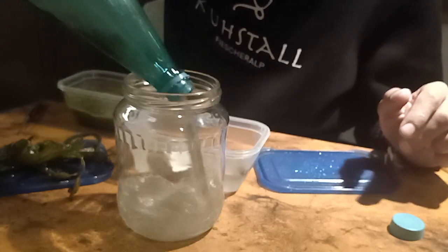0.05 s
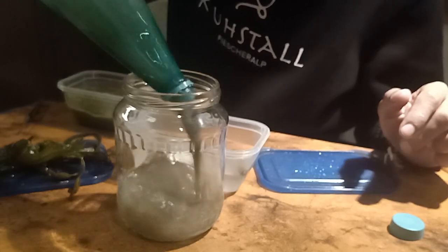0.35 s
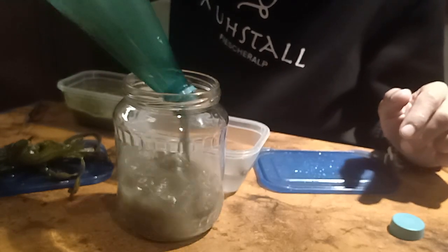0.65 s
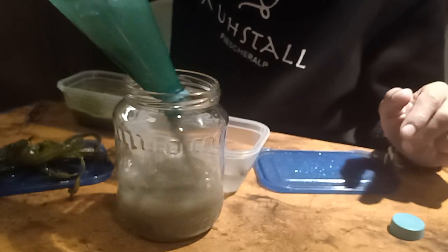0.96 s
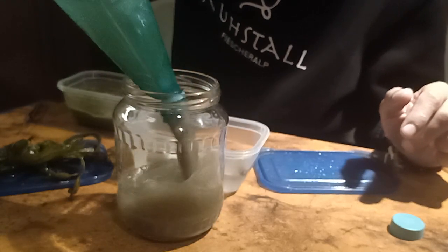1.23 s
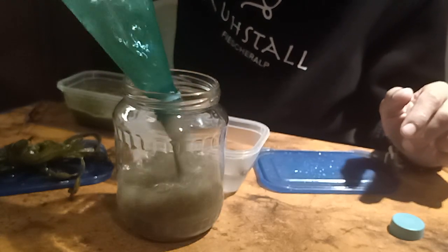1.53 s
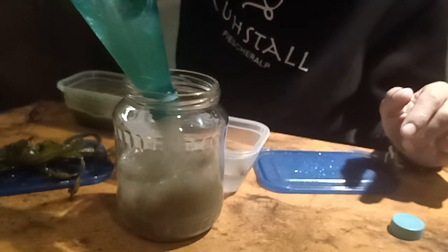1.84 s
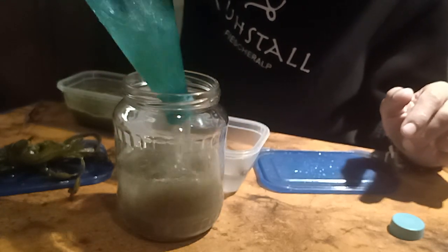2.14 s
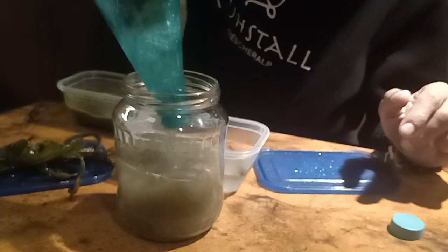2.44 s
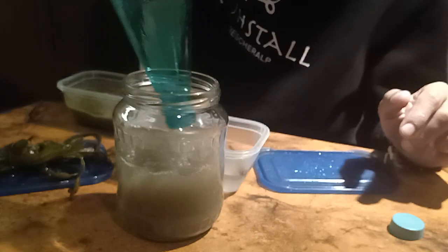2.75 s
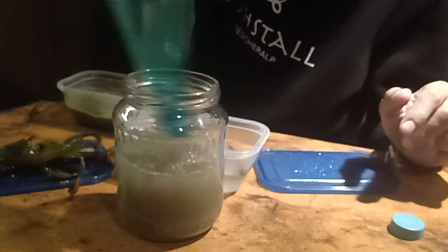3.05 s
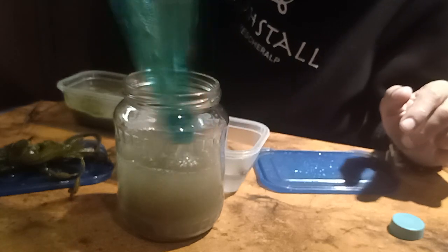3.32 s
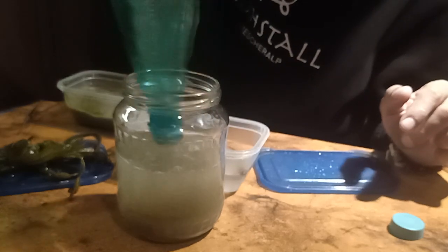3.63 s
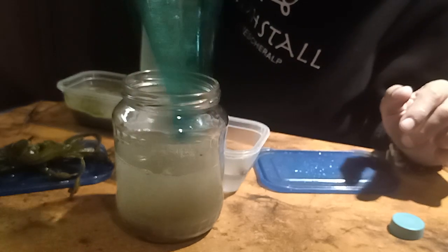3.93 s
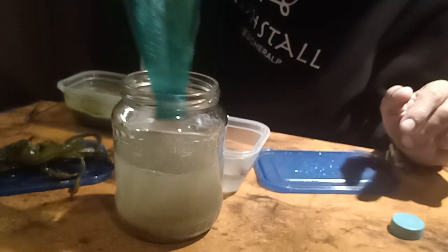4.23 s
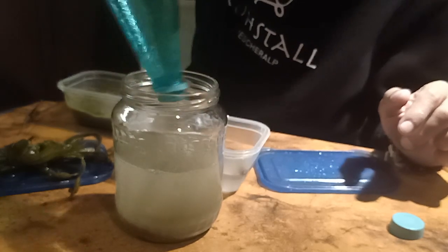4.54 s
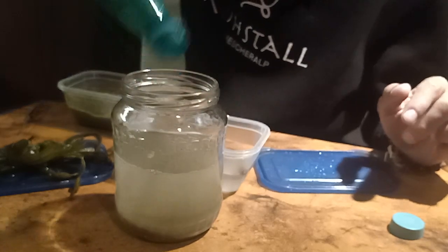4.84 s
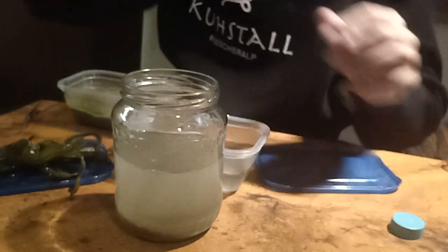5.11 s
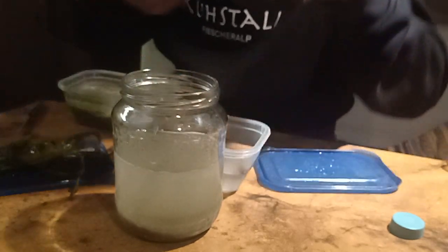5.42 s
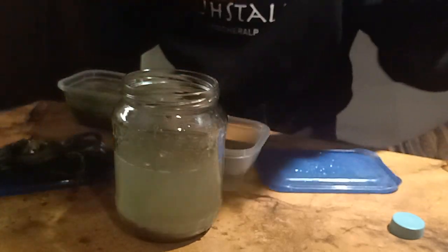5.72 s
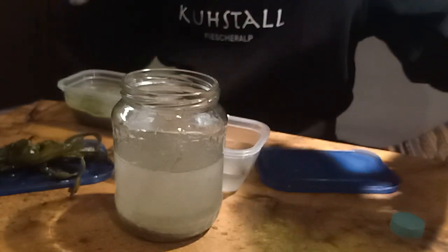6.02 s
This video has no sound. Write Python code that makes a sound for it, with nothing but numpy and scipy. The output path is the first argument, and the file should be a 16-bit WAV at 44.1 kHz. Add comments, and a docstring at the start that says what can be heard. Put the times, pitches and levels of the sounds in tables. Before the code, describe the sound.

Sandy water dribbles and plops into a glass jar, then a plastic funnel is knocked repeatedly against the rim, thumping the table.

```python
"""At a wooden table, close up, sandy water dribbles from a plastic funnel into a glass jar.
Lumps of wet sand plop in, boom the air in the jar, trap bubbles and throw spray against the glass.
Then the funnel is knocked and shaken against the jar, which rings and thumps the table.
Sleeves rustle as the funnel is taken away and put down with a soft clatter."""
import sys
import numpy as np
from scipy import signal
from scipy.fft import rfft, irfft, next_fast_len
from scipy.io import wavfile
from scipy.ndimage import uniform_filter1d

SR = 44100
rng = np.random.default_rng(int(sys.argv[2]) if len(sys.argv) > 2 else 0)


def log_audio(samples):
    """Write samples as a 16-bit WAV file to the path given in sys.argv[1]."""
    # one column per channel
    frames = np.atleast_2d(samples).T
    # limit to full scale, then quantise
    limited = np.clip(frames, -1, 1)
    pcm = np.round(limited * 32767).astype(np.int16)
    wavfile.write(sys.argv[1], SR, pcm)


N = 276493
TIME = np.arange(N) / SR
AGE = np.arange(SR * 3 // 4) / SR  # seconds since a hit
CLICK = signal.unit_impulse(len(AGE), 40)


def gain_of(db):
    """Decibels to amplitude."""
    return 10 ** (np.asarray(db) / 20)


def unit_rms(x):
    """Scales to rms 1."""
    return x / np.sqrt(np.mean(x ** 2) + 1e-20)


def curve_at(points, hz):
    """Reads a curve on a log-frequency axis."""
    freqs, values = np.transpose(points)
    return np.interp(np.log(hz + 1), np.log(freqs + 1), values)


def decay(t, t60):
    """Falls by 60 dB in t60 seconds, 4 ms at the quickest."""
    return 1000. ** (-t / np.maximum(t60, .004))


def pan(db):
    """Stereo gains with the left louder than the right by db."""
    return gain_of(np.array([[db], [-db]]) / 2)


def add(mix, s, sound):
    """Lays a sound into the mix at s seconds."""
    part = mix[:, max(round(s * SR), 0):][:, :sound.shape[-1]]
    part += sound[..., :part.shape[1]]


def wander(shape, first, second):
    """Random modulation: noise smoothed over two widths, in samples."""
    return unit_rms(uniform_filter1d(uniform_filter1d(rng.standard_normal(shape), first), second))


# stereo image of the noisy layers: (frequency [Hz], left-right correlation [0-1])
STEREO_LIKENESS = [(100, 0), (300, 1), (700, 0.31), (2500, 0.1), (12000, 0.2)]
def stereo_image(x):
    """Pulls two unrelated channels to the centre in the low mids and leaves the treble wide."""
    size = next_fast_len(x.shape[1])
    a, b = rfft(x, size)
    same = curve_at(STEREO_LIKENESS, np.fft.rfftfreq(size, 1 / SR))
    mid, side = a * np.sqrt((1 + same) / 2), b * np.sqrt((1 - same) / 2)
    return irfft(np.array([mid + side, mid - side]), size)[:, :x.shape[1]]


def eq(x, spectrum, treble_db=0, size=2048):
    """Minimum-phase EQ of unit energy, then a shelf that applies 11% (lows) to 28% of treble_db."""
    hz = abs(np.fft.fftfreq(size, 1 / SR))
    shelf = gain_of(treble_db * curve_at([(2200, 0.11), (4200, 0.28)], hz))
    gain = unit_rms(gain_of(curve_at(spectrum, hz))) * shelf
    taps = np.fft.ifft(np.exp(np.conj(signal.hilbert(np.log(gain + 1e-6))))).real
    return signal.oaconvolve(x, taps[None], axes=1)[:, :x.shape[1]]


def burst(t60, snap, snap_t60, rise_t60=0.012, grain_db=3):
    """An uneven rattle of tiny contacts: a quick attack, then two decays layered."""
    grain = unit_rms(gain_of(grain_db * wander(len(AGE), 70, 50)))
    noise = stereo_image(rng.standard_normal((2, len(AGE)))) * grain
    return noise * (decay(AGE, t60) + snap * decay(AGE, snap_t60)) * (1 - decay(AGE, rise_t60)) ** 2


def ringing(modes, scatter_db, spread, detune=0, since=0):
    """Each hit lands elsewhere, so modes vary in level and pitch and reach the two sides out of step."""
    out = np.zeros((2, len(AGE)))
    for hz, db, t60 in modes:
        strength, skew, bend = np.clip(rng.standard_normal(3), -1.5, 1.5)
        stereo_phase = spread * skew * np.array([[1], [-1]])
        phase = 2 * np.pi * hz * (1 + detune * bend) * (AGE + since) + stereo_phase
        out += gain_of(db + scatter_db * strength) * decay(AGE, t60) * np.sin(phase)
    return out * (1 - decay(AGE, 0.0063))


def chirp(hz, swell, t60, rise=0.0053, waver=0.017, rough=0.033):
    """A bubble-like tone that swells and rings out, trembling as its pitch creeps up."""
    t = AGE[:SR // 5]
    attack = np.sin(np.pi / 2 * np.minimum(t / max(swell, .0005), 1)) ** 2
    envelope = attack * decay(np.maximum(t - swell, 0), t60)
    wobble, tremble = wander((2, len(t)), 130, 90)
    pitch = hz * (1 + rise * np.tanh(t / 0.037) + waver * wobble)
    return envelope * (1 + rough * tremble) * np.sin(2 * np.pi * np.cumsum(pitch) / SR)


# EQ of the quiet room: (frequency [Hz], level [dB])
ROOM_TONE_EQ = [(20, -5.5), (110, -17), (1260, -29), (2320, -25), (3340, -34.5), (4940, -34), (7700, -47),
                (13500, -46), (16000, -57.5)]
def room_tone(level_db=-57.5):
    """A steady bed of faint rumble and hiss."""
    noise = stereo_image(rng.standard_normal((2, N)))
    return gain_of(level_db) * unit_rms(eq(noise, ROOM_TONE_EQ, size=8192))


# fader ride of the thin stream between the lumps: (time [s], level [dB])
STREAM_FADER = [(0.0, -31), (0.09, -44.5), (1.04, -46), (1.47, -41.5), (2.09, -47), (2.5, -45), (2.77, -41),
                (2.88, -50.5)]
# the jar's colour on the stream: (frequency [Hz], level [dB])
TRICKLE_EQ = [(40, -17), (160, 10.5), (440, -5.5), (630, -5.5), (1000, -9.5), (1700, -18), (2350, 4.5),
              (3200, -14.5), (5000, -16), (10000, -43.5), (14000, -30.5), (16000, -39.5)]
def trickle(per_s=1300, spread_db=5, hiss=0.5, cycles=11, clump_db=3, pitches=48):
    """Wet grit and tiny bursting bubbles patter over a soft hiss, all coloured by the jar."""
    patter, length = np.zeros((2, N)), STREAM_FADER[-1][0]
    for hz in np.geomspace(350, 14000, pitches):
        t = AGE[:SR // 20]
        life = t * hz / cycles
        blip = life * np.exp(-np.pi * life) * np.sin(2 * np.pi * hz * t * (1 + .04 * life))
        for when, size, side in rng.random((round(per_s * length / pitches), 3)):
            db = spread_db * min(-np.log(1 - size), 3)
            add(patter, when * length, gain_of(db) * hz * pan(8 * (side - .5)) * blip)
    stream = unit_rms(patter) + hiss * stereo_image(rng.standard_normal((2, N)))
    clumps = gain_of(clump_db * wander(N, 1200, 900))  # the sand comes in clots
    fader = gain_of(np.interp(TIME, *np.transpose(STREAM_FADER), left=-120, right=-120))
    return eq(unit_rms(stream * clumps) * fader, TRICKLE_EQ)


def inside_jar(x, t60=0.025):
    """Sound bounces quickly between the glass walls before it leaves the neck."""
    echoes = rng.standard_normal((2, len(AGE))) * decay(AGE, t60) * (1 - decay(AGE, 0.004))
    return signal.fftconvolve(x, echoes / np.linalg.norm(echoes[0]), axes=1)[:, :N]


def jar_hz(s, start_hz=551, hz_per_s=57):
    """The pitch of the air in the jar climbs as it fills."""
    return start_hz + hz_per_s * s


# the jar's boom sits mostly to the left: (pitch [Hz], left over right [dB])
BOOM_PAN = [(450, -2), (630, 10), (900, 5), (2000, 5)]
# EQ of water pushed aside: (frequency [Hz], level [dB])
SLOSH_EQ = [(45, -4.5), (115, -11), (170, -3.5), (450, 3), (1200, -20), (3500, -44.5)]
def plop(db, slosh_db, hz, tone):
    """A tone from the jar, panned by its pitch, over the slosh of the water that a lump pushes aside."""
    out = gain_of(slosh_db) * eq(burst(0.14, snap=4.46, snap_t60=0.016, rise_t60=0.013), SLOSH_EQ)
    add(out, 0, gain_of(db) * unit_rms(pan(curve_at(BOOM_PAN, hz))) * tone)
    return out


def fizz(hz, octaves, count=7, delay_s=0.0064, t60=0.022):
    """A cluster of tiny bubbles around one pitch, each a short rising chirp."""
    out = np.zeros((2, SR // 4))
    for k, (place, when, size, side) in enumerate(rng.random((count, 4))):
        blip = chirp(hz * 2 ** (octaves * (2 * place - 1)), swell=.001, t60=t60, rise=.12, waver=.02)
        onset = -delay_s * np.log(1 - (k + when / 2) / count)  # dense at first, then thinning
        add(out, onset, gain_of(-6 * size) * pan(10 * (side - .5)) * blip)
    return out / np.sqrt(count)


# lumps hitting the water: (time [s], boom [dB], pops [dB], pop pitch [Hz], slosh [dB], attack [s])
GLUG_CUES = [(0.005, -34, -24, 1920, -40, 0.0059), (0.169, -17, -24.5, 2060, -31, 0.0079),
             (0.39, -27.5, -29.5, 2420, -34, 0.005), (0.564, -30, -24.5, 2300, -44.5, 0.0059),
             (0.7132, -28.5, -24.5, 1980, -42, 0.003), (0.7649, -21.5, -14, 2435, -33.5, 0.0052),
             (0.901, -31, -30.5, 2200, -46, 0.0017), (0.932, -42, -28.5, 2480, -45, 0.018),
             (1.065, -29.5, -33.5, 2180, -40.5, 0.0039), (1.112, -29, -39.5, 2690, -35, 0.004),
             (1.2526, -18, -18.5, 2210, -31.5, 0.0022), (1.34, -19, -21.5, 2660, -37.5, 0.003),
             (1.375, -16, -24, 2580, -34.5, 0.0068), (1.763, -21, -25, 3280, -36.5, 0.0042),
             (1.804, -23.5, -33, 2256, -38, 0.0027), (2.1866, -29.5, -16.5, 2630, -36, 0.0034)]
# upper modes of the air in the jar: (frequency [Hz], level [dB], t60 [s])
JAR_AIR_MODES = [(2077, -8, .08), (2395, -10, 0.16), (2410, -20.5, 0.11)]
def glugs(boom_trim_db=3.5, pop_trim_db=3, ring_trim_db=-2, glide=.045, scatter=.012):
    """Each lump sounds the air in the jar: a rising boom, a cluster of bright pops, the upper modes."""
    out = np.zeros((2, N))
    for s, boom_db, pop_db, pop_hz, slosh_db, attack in GLUG_CUES:
        start_hz = jar_hz(s) * (1 - glide / 2 + scatter * rng.standard_normal())
        boom = chirp(start_hz, attack, t60=0.08, rise=glide, waver=0.018, rough=0.15)
        add(out, s, plop(boom_db + boom_trim_db, slosh_db, jar_hz(s), boom))
        add(out, s, gain_of(pop_db + pop_trim_db) * pan(-0.47) * fizz(pop_hz, octaves=.17))
        ring = ringing(JAR_AIR_MODES, scatter_db=3, spread=1, detune=0.015)
        add(out, s, gain_of(pop_db + ring_trim_db) * pan(-4) * ring)
    return out


# spray thrown against the glass: (time [s], level [dB])
SPLASH_CUES = [(0.0074, -36), (0.171, -34), (0.392, -33.5), (0.768, -32), (0.7832, -29.5), (0.9352, -26),
               (1.1099, -30.5), (1.3751, -12.5), (1.3996, -24.5), (1.648, -30), (1.7644, -21.5),
               (1.8343, -32.5), (1.9106, -30), (2.1877, -28), (2.558, -41), (2.624, -8.5), (2.776, -32.5)]
# EQ of spray on glass: (frequency [Hz], level [dB])
SPRAY_EQ = [(60, -65), (1500, -8), (2400, 2.5), (3400, -6.5), (4100, 4.5), (5200, 3), (6300, -8.5),
            (8000, -24), (11000, -24.5), (13700, -19.5), (16000, -35.5)]
# the jar's answer to a sharp splash: (frequency [Hz], level [dB], t60 [s])
SPLASH_MODES = [(3960, -2, .045), (4880, -1, .045), (5130, -2, .045), (5640, -2, .045)]
def splashes(spray_db=-10, click_db=20, ring_db=-15, fizz_db=-6, fizz_hz=3900):
    """Spray and grit hit the glass: a sharp tick, then patter, tiny bubbles and a short ring."""
    out = np.zeros((2, N))
    for s, db in SPLASH_CUES:
        patter = burst(0.099, snap=1.5, snap_t60=0.03, rise_t60=0.004) + gain_of(click_db) * CLICK
        add(out, s, gain_of(db + spray_db) * eq(patter, SPRAY_EQ))
        add(out, s, gain_of(db + fizz_db) * fizz(fizz_hz, octaves=.6, count=9))
        add(out, s, gain_of(db + ring_db) * ringing(SPLASH_MODES, scatter_db=2, spread=1, detune=.006))
    return out


def fallback_drips(per_s=50, spread_db=4, low_hz=1500, high_hz=6000, flight_s=0.07):
    """Lumps throw up drops that soon fall back; each stirs the jar's air, ticks and pops a bubble."""
    out = np.zeros((2, N))
    lump_times = [row[0] for row in list(GLUG_CUES) + list(BUBBLE_CUES)]
    for lump, pitch, detune, side, *chance in rng.random((round(per_s * STREAM_FADER[-1][0]), 8)):
        flight, *strengths = np.minimum(-np.log(1 - np.array(chance)), 3)
        s = lump_times[int(lump * len(lump_times))] + flight_s * flight
        stream_db = np.interp(s, *np.transpose(STREAM_FADER))
        boom_db, tick_db, pop_db = stream_db + spread_db * np.array(strengths)
        hz = jar_hz(s) * (1 + 0.39 * (detune - .5))
        boom = chirp(hz, swell=0.011, t60=0.1)
        tick = burst(0.099, snap=1.1, snap_t60=0.004, rise_t60=.004)[:, :SR // 10]
        pop = chirp(low_hz * (high_hz / low_hz) ** pitch, swell=.001, t60=0.021, rise=.15)
        add(out, s, gain_of(boom_db - 7) * pan(curve_at(BOOM_PAN, hz)) * boom)
        add(out, s, gain_of(tick_db - 10) * eq(tick, SPRAY_EQ))
        add(out, s, gain_of(pop_db + 1) * pan(10 * (side - .5)) * pop)
    return out


# clusters of tiny bursting bubbles: (time [s], level [dB], pitch [Hz])
FOAM_CUES = [(0.117, -19.5, 3695), (0.304, -24, 1700), (0.512, -19.5, 3000), (0.579, -40, 2360),
             (1.232, -29, 4220), (1.352, -23.5, 2730)]
def foam():
    """Patches of foam burst on the surface."""
    out = np.zeros((2, N))
    for s, db, hz in FOAM_CUES:
        add(out, s, gain_of(db) * fizz(hz, octaves=.2))
    return out


# drops that only stir the air in the jar: (time [s], level [dB])
DROP_CUES = [(0.258, -34), (1.013, -35), (1.146, -21.5), (1.264, -18), (1.446, -33), (1.493, -31.5),
             (1.552, -36)]
def drops():
    """Single drops set the air in the jar ringing, each at a slightly different pitch."""
    out = np.zeros((2, N))
    for s, db in DROP_CUES:
        hz = jar_hz(s) * rng.uniform(.98, 1.07)
        tone = chirp(hz, swell=0.0056, t60=0.11)
        add(out, s, gain_of(db) * unit_rms(pan(curve_at(BOOM_PAN, hz))) * tone)
    return out


# clots of sand landing flat: (time [s], level [dB])
SPLAT_CUES = [(0.2994, -38.5), (0.7135, -39.5), (0.898, -38), (1.201, -29.5), (2.133, -33)]
# EQ of a wet slap: (frequency [Hz], level [dB])
SPLAT_EQ = [(60, -7), (160, -2), (900, -4.5), (2400, -1.5), (3500, -11), (6000, -29), (16000, -54.5)]
def splats(trim_db=-3):
    """Wet clots slap the surface of the water."""
    out = np.zeros((2, N))
    for s, db in SPLAT_CUES:
        slap = burst(0.16, snap=0.35, snap_t60=0.004, rise_t60=.004)
        add(out, s, gain_of(db + trim_db) * eq(slap, SPLAT_EQ))
    return out


# pockets of air that ring at their own pitch: (time [s], level [dB], pitch [Hz])
BUBBLE_CUES = [(0.7812, -17.5, 490), (0.935, -23, 476), (1.144, -18, 463), (1.2022, -25.5, 322),
               (1.211, -27.5, 160), (1.339, -26, 470), (1.6984, -14.5, 443), (1.808, -27.5, 377),
               (1.8289, -29, 927), (1.911, -12, 474), (2.049, -15.5, 663), (2.09, -31, 1045),
               (2.189, -28.5, 424), (2.396, -25.5, 276), (2.443, -35.5, 292), (2.732, -23.5, 938)]
def bubbles(trim_db=2, usual_db=-12, usual_hz=477):
    """Trapped air plops: gentle, low bubbles swell and die more slowly; big ones move the most water."""
    out = np.zeros((2, N))
    for s, db, hz in BUBBLE_CUES:
        stretch = min(gain_of(0.7 * (usual_db - db)), 2) * (usual_hz / hz) ** 0.35
        tone = chirp(hz, swell=0.0015 * stretch, t60=0.032 * stretch)
        slosh_db = db - 15 - 8 * np.log2(hz / usual_hz)
        add(out, s, plop(db + trim_db, slosh_db, hz, tone))
    return out


# EQ of plastic cracking against glass: (frequency [Hz], level [dB])
CRACK_EQ = [(100, -47), (300, -8), (1000, 1.5), (1650, 1), (2300, -0.5), (3200, -7), (4600, -10.5),
            (7200, -30), (10500, -51.5), (13700, -34.5), (16000, -53.5)]
# the funnel and the air in the jar: (frequency [Hz], level [dB], t60 [s])
CLACK_MODES = [(634, -10, 0.11), (881, -3.5, 0.11), (1376, -13, 0.11), (1551, 3, 0.045), (1746, 0.5, 0.042),
               (2384, -2, 0.052), (2450, -9.5, 0.11), (3800, -18, 0.08), (4130, -13, 0.075)]
def funnel_crack(db, click_db=17):
    """One hard contact, then a rattle; the harder the hit, the more the hollow funnel clacks."""
    contact = burst(0.1, snap=0.69, snap_t60=0.049, rise_t60=0.004) + gain_of(click_db) * CLICK
    crack = eq(contact, CRACK_EQ, treble_db=-8.5 - 0.8 * db)  # hard hits flex the plastic: rounder
    clack = ringing(CLACK_MODES, scatter_db=0, spread=1, detune=0.016)
    return gain_of(db - 11.5) * crack + gain_of(1.4 * db - 7) * pan(0.38) * clack


# the jar standing on the table, and a low ring of the room near 110 Hz: (frequency [Hz], level [dB], t60 [s])
WOOD_MODES = [(109.9, -18, 0.62), (153.7, -1.5, 0.19), (181.3, 1.5, 0.19), (258.6, 6.5, 0.17),
              (309, -15.5, 0.38), (319, 9.5, 0.048), (458.5, -3.5, 0.15), (755.6, -3.5, 0.058)]
# EQ of a dull wooden thud: (frequency [Hz], level [dB])
THUD_EQ = [(30, -48), (80, -7), (150, -4), (450, -1.5), (750, -6.5), (1200, -19), (3000, -60)]
def table_thump(rock_db, thump_db, thump_hz, trim_db=-8, rebound=0.45, rebound_s=0.01):
    """The jar thumps the table and rocks: the wood rings under a quick double thud."""
    # the length of the contact favours modes near the pitch of the thump
    modes = [(hz, db - 0.5 * abs(np.log2(hz / thump_hz)), t60) for hz, db, t60 in WOOD_MODES]
    rock = gain_of(rock_db + trim_db)
    out = rock * pan(-0.9) * ringing(modes, scatter_db=4, spread=0.2, detune=0.04)
    add(out, 0, gain_of(thump_db) * chirp(thump_hz, swell=0.0019, t60=0.022, waver=0.13))
    for delay, share in ((0, 1), (rebound_s, rebound)):
        add(out, delay, share * rock * eq(burst(0.053, snap=3.58, snap_t60=0.097), THUD_EQ))
    return out


# EQ of wet grit shaken in the funnel: (frequency [Hz], level [dB])
GRIT_EQ = [(500, -21.5), (5000, 3), (8000, -24), (10500, -21), (13700, -11.5), (16000, -22.5)]
def grit(per_s=700, bounce_db=-8, t60=0.11, shell_t60=0.016):
    """A jolt snaps the plastic and bounces grit against it, all through the shell's short ring."""
    bounces = rng.standard_normal(len(AGE)) * (rng.random(len(AGE)) < per_s / SR) * decay(AGE, t60)
    shell = (rng.standard_normal((2, len(AGE))) * decay(AGE, shell_t60))[:, :SR // 20]
    clicks = CLICK + gain_of(bounce_db) * bounces
    return eq(signal.oaconvolve(clicks[None], shell / np.linalg.norm(shell[0]), axes=1), GRIT_EQ)


# the funnel hits the jar: (time [s], crack [dB], rocking [dB], thump [dB], thump pitch [Hz],
# glass ring [dB], delay of the ring's dip [s])
KNOCK_CUES = [(2.624, -11, -35, -22, 410, -54, 0.058), (2.8986, -7, -39.5, -13.5, 485, -66, 0.065),
              (3.132, -3.5, -34, -11, 577, -55, 0.075), (3.267, -13, -20, -17, 410, -45, 0.13),
              (3.3938, -13, -17, -13, 366, -32, 0.077), (3.5301, -17, -22.5, -17.5, 197, -32.5, 0.07),
              (3.572, -12.5, -17.5, -12, 212, -30.5, 0.093), (3.6987, -10.5, -19, -11, 368, -29.5, 0.044),
              (3.8292, -11, -17.5, -14, 222, -23.5, .028), (3.9673, -13.5, -17.5, -9.5, 400, -21.5, .015),
              (4.089, -5, -27.5, -13, 583, -26.5, 0.076), (4.43, -18, -24, -6, 374, -42.5, 0.091),
              (4.5478, -16, -18.5, -4.5, 389, -30.5, .044)]
# the funnel swings back with a dull thump: (time [s], level [dB])
BACKSWING_CUES = [(3.1798, -36), (3.2928, -19.5), (3.44, -22), (3.5971, -21.5), (3.772, -24),
                  (3.849, -19.5), (3.992, -21), (4.1486, -32.5)]
def knocks(back_hz=270, back_crack_db=2.5, grit_db=8, emptying_s=3.9, loss_db_per_s=4.5):
    """The funnel cracks against the neck, jolting jar and table; its grit fades as it runs empty."""
    out = np.zeros((2, N))
    backswings = [(s, db + back_crack_db, db, db, back_hz) for s, db in BACKSWING_CUES]
    for s, crack_db, rock_db, thump_db, thump_hz, *_ in list(KNOCK_CUES) + backswings:
        add(out, s, funnel_crack(crack_db))
        add(out, s, table_thump(rock_db, thump_db, thump_hz))
        emptied_db = loss_db_per_s * max(s - emptying_s, 0)
        add(out, s, gain_of(rock_db + grit_db - emptied_db) * grit())
    return out


# the jar's glass wall: (frequency [Hz], level [dB], t60 [s])
WALL_MODES = [(2108, 9, 0.55), (4860, -8, 0.1), (5700, -19.5, 0.067), (7100, -16.5, 0.12),
              (8300, -18.5, 0.09)]
def glass_ring(trim_db=-7, swell_s=0.045, hold_s=0.165, gate_steepness=6.2, dip_width_s=0.025):
    """A glassy ring swells after each knock; a noise-gate-like envelope dips it once and cuts it short."""
    out = np.zeros((2, N))
    gaps = np.diff([row[0] for row in KNOCK_CUES], append=N / SR)
    for (s, *_, ring_db, dip_s), gap in zip(KNOCK_CUES, gaps):
        envelope = (1 - decay(AGE, swell_s)) * np.exp(-(AGE / min(gap, hold_s)) ** gate_steepness)
        dip = np.tanh((dip_s - AGE) / dip_width_s) + 0.3  # the offset leaves it quieter after the dip
        ring = ringing(WALL_MODES, scatter_db=1, spread=0.3, since=s)
        add(out, s, gain_of(ring_db + trim_db) * envelope * dip * ring)
    return out


def hum(peak_s=2.857, width_s=0.19, hz=103, level_db=-50.5):
    """A faint low hum swells and fades as the knocking begins."""
    swell = np.exp(-((TIME - peak_s) / width_s) ** 2)
    return gain_of(level_db) * swell * np.sin(2 * np.pi * hz * TIME)


# strokes of the sleeves: (peak time [s], level [dB], length [s])
SLEEVE_CUES = [(4.994, -49, 0.21), (5.13, -50, 0.35), (5.215, -45, 0.22), (5.484, -49, 0.065),
               (5.541, -47.5, 0.33), (5.658, -51, 0.14)]
# EQ of rubbing cloth: (frequency [Hz], level [dB])
CLOTH_EQ = [(40, -38), (130, -17), (310, -3), (410, -9.5), (1400, -19), (2350, -10.5), (3300, -20),
            (5200, -19), (7500, -41.5)]
def sleeves(per_s=600, spread_db=3, attack_share=0.13, depth_db=38.5):
    """Cloth slips in tiny catches over a hiss; each stroke of the arm swells and fades."""
    sizes = gain_of(spread_db * np.minimum(rng.exponential(1, N), 3)) * (rng.random(N) < per_s / SR)
    rustle = unit_rms(sizes * rng.standard_normal((2, N))) + rng.standard_normal((2, N))
    strokes = np.zeros(N)
    for s, db, length in SLEEVE_CUES:
        from_peak = np.maximum((s - TIME) / attack_share, (TIME - s) / (1 - attack_share)) / length
        strokes += gain_of(db - depth_db * from_peak)
    return eq(unit_rms(stereo_image(rustle)) * strokes, CLOTH_EQ)


# the funnel touches the table: (time [s], level [dB])
SET_DOWN_CUES = [(6.207, -48), (6.2315, -56)]
# EQ of the hollow, empty funnel: (frequency [Hz], level [dB])
FUNNEL_EQ = [(100, -31), (560, 9), (800, -19), (2300, 6), (3200, -10), (3800, 2), (4600, -27), (16000, -43)]
def set_down(trim_db=-3):
    """The empty funnel clatters softly on the table."""
    out = np.zeros((2, N))
    for s, db in SET_DOWN_CUES:
        add(out, s, gain_of(db + trim_db) * eq(burst(0.41, snap=11, snap_t60=0.02), FUNNEL_EQ))
    return out


# the room's reverb time: (frequency [Hz], t60 [s])
REVERB_TIMES = [(100, 0.05), (300, 0.064), (1000, 0.19), (4000, 0.22), (14000, 0.019)]
def reverb(x):
    """Scattered reflections of a small room, the upper mids lasting longest."""
    reflections = rng.standard_normal((2, len(AGE))) * (1 - decay(AGE, 0.019))
    hz, t, bands = signal.stft(reflections, SR, nperseg=256)
    tail = signal.istft(bands * decay(t, curve_at(REVERB_TIMES, hz)[:, None]), SR, nperseg=256)[1]
    return signal.fftconvolve(x, tail / np.linalg.norm(tail[0]), axes=1)[:, :N]


def scene():
    """The mix: the pour, the knocks and the rustle in a quiet room."""
    pour = glugs() + drops() + bubbles() + foam() + splashes() + splats()
    pour += gain_of(-4) * fallback_drips() + gain_of(-5.5) * trickle()
    pour += gain_of(-6) * inside_jar(pour)
    hits = knocks() + glass_ring() + set_down()
    send = gain_of(-25.5) * pour + gain_of(-22.5) * hits
    return pour + hits + gain_of(-0.5) * sleeves() + reverb(send) + room_tone() + hum()


def record(dry, low_cut_hz=66, high_cut_hz=16200, lag_samples=6):
    """The microphone hears the left side slightly late; then low cut, clip at full scale, high cut."""
    channels = np.array([np.pad(dry[0], (lag_samples, 0))[:N], dry[1]])
    channels = signal.sosfilt(signal.butter(4, low_cut_hz, "highpass", fs=SR, output="sos"), channels)
    high_cut = signal.firwin(511, high_cut_hz, window=("kaiser", 9), fs=SR)
    return signal.oaconvolve(np.clip(channels, -1, 1), high_cut[None], "same")


dry = scene()
out = record(dry)
log_audio(out)
```